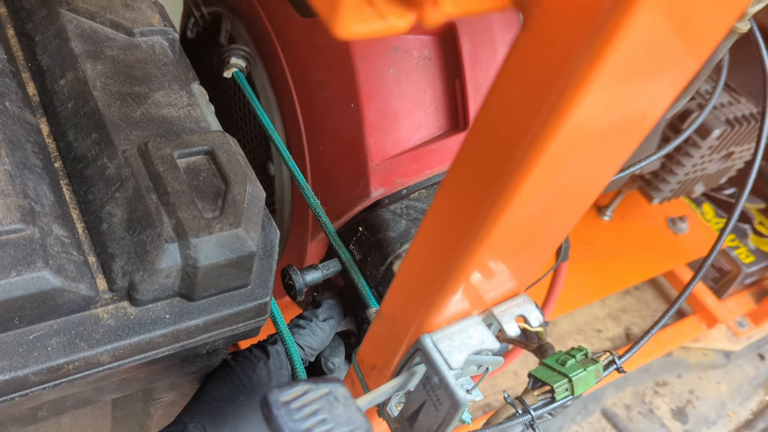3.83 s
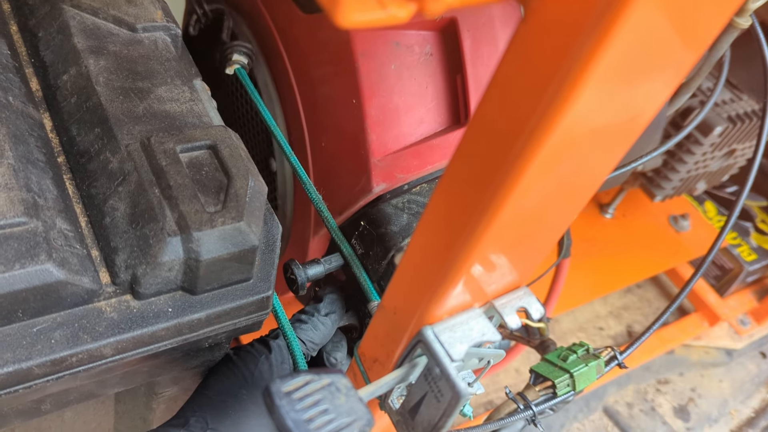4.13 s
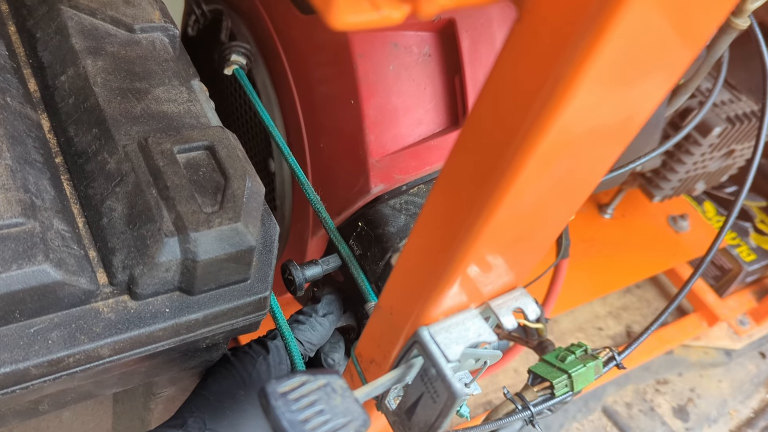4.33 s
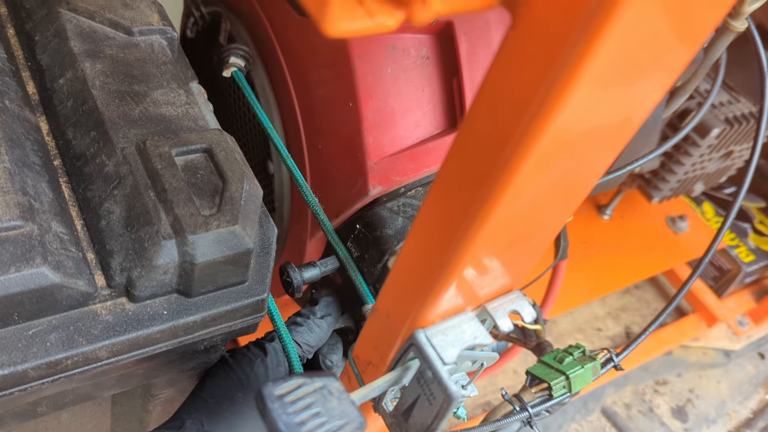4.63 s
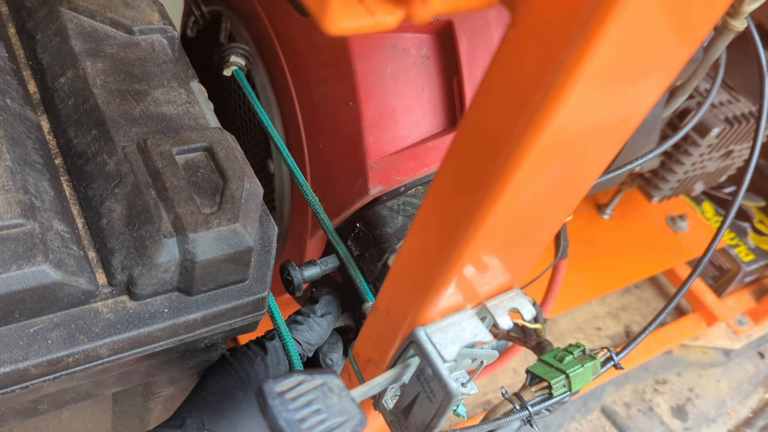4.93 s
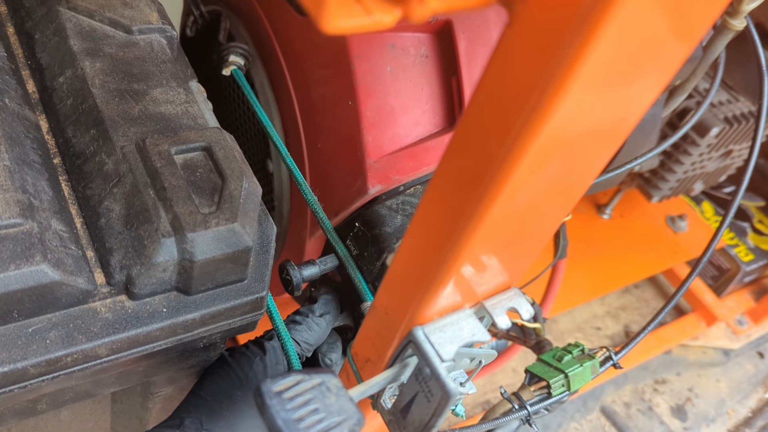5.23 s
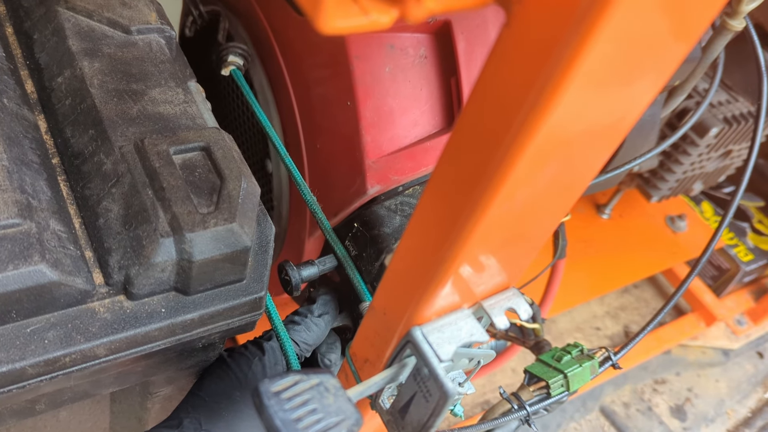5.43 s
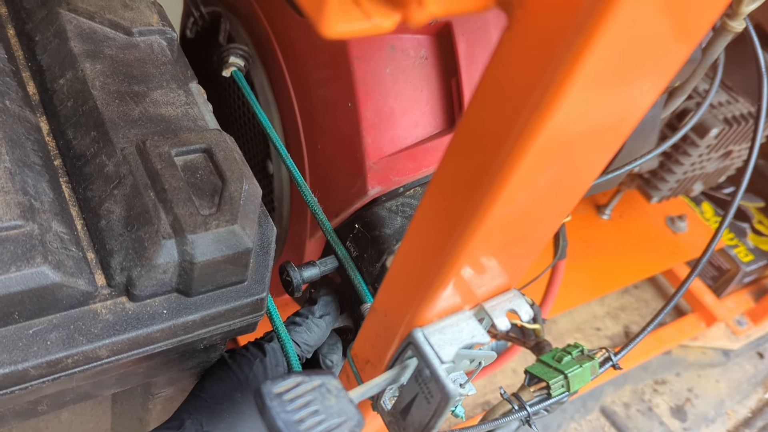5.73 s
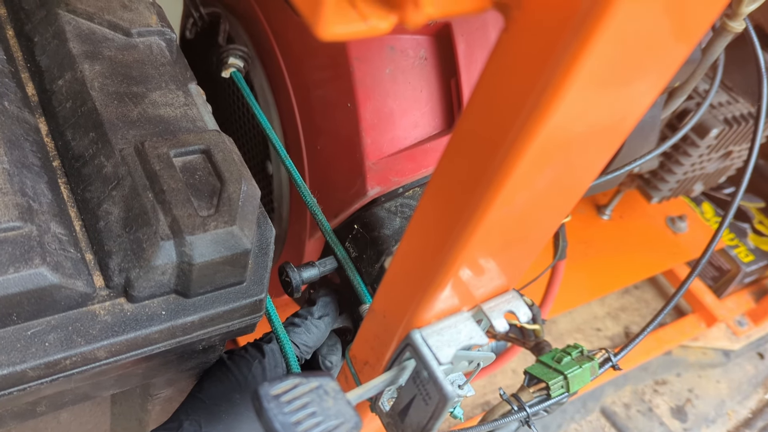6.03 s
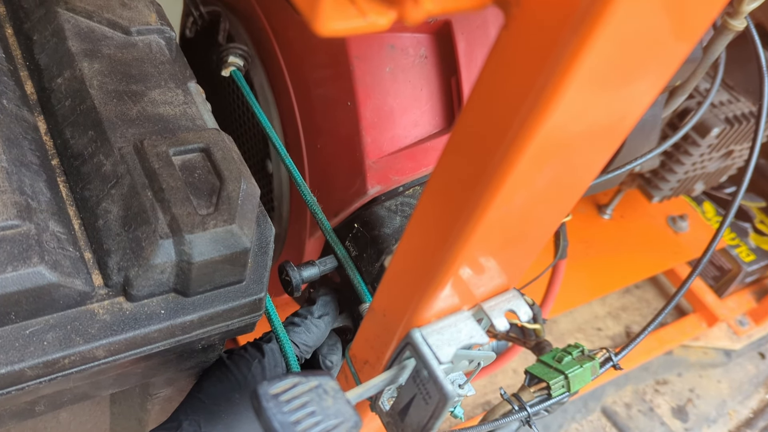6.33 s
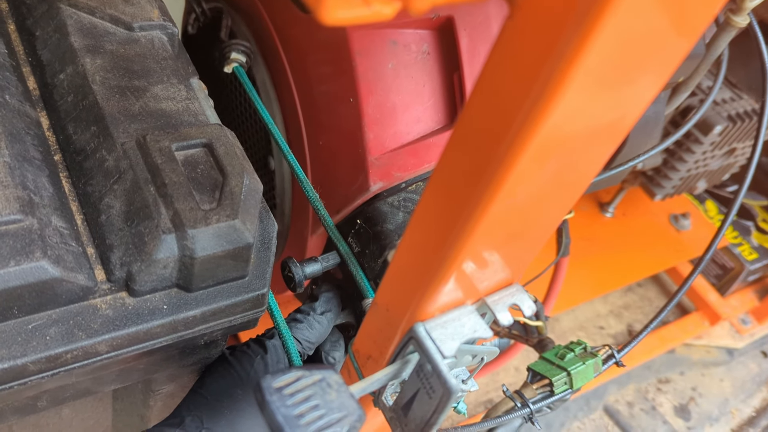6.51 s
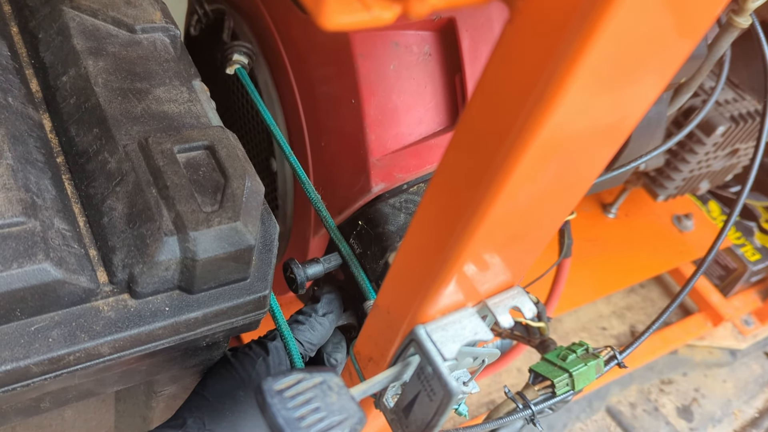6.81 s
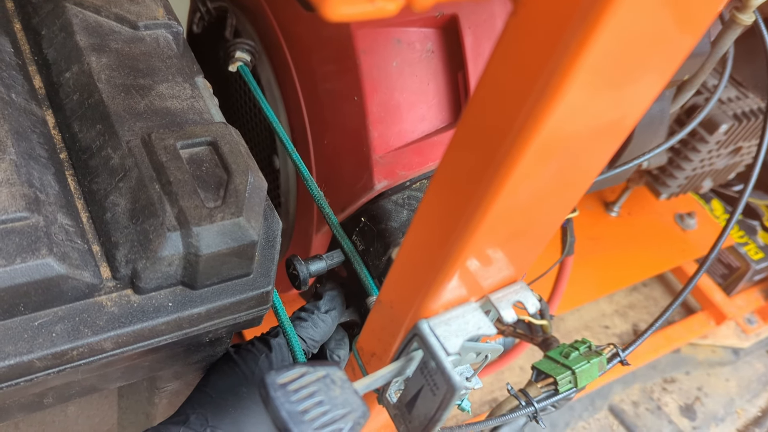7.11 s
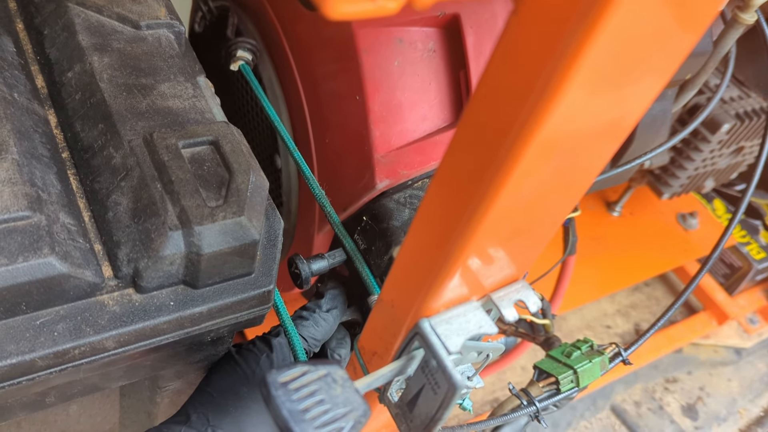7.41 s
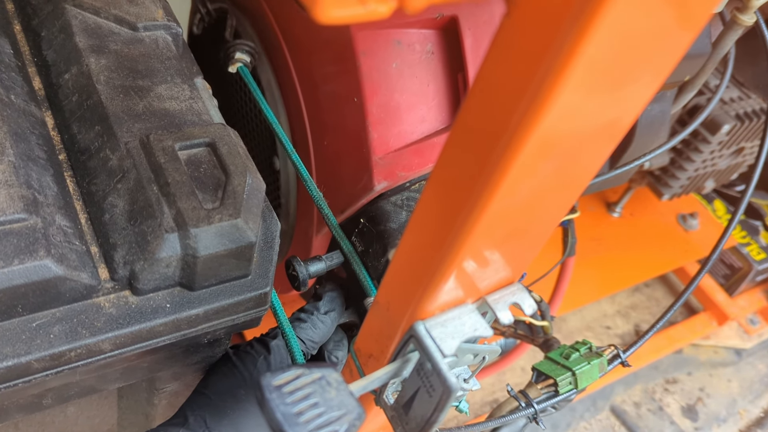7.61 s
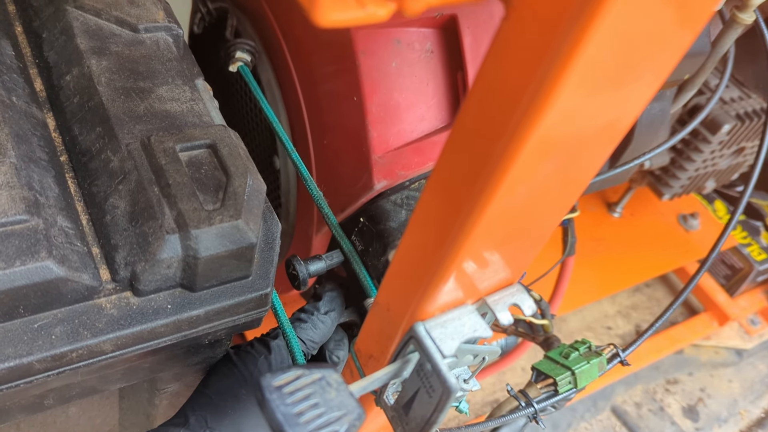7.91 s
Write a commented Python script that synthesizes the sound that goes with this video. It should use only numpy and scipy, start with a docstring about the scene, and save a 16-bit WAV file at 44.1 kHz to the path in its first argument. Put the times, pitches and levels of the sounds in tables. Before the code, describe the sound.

After a faint rustle and sharp switch clicks, a geared starter whirs in a limping rhythm, with late kicks as the engine almost fires.

```python
"""A starter motor cranks a small V-twin engine, close by outdoors; its pinion whines and rattles on the ring gear.
Both are built from the rate at which teeth meet, which sags at each of the two uneven compressions.
A hand first rustles (grainy noise) over a dull wash, and a key and solenoid click (cracks that ring the switch).
Gas puffs ring the exhaust pipe. Late on the engine catches three times, kicks ahead of the starter and falls back."""
import sys
import numpy as np
from scipy import signal
from scipy.fft import rfft, irfft, next_fast_len
from scipy.io import wavfile
from scipy.ndimage import uniform_filter1d

SR = 44100
rng = np.random.default_rng(int(sys.argv[2]) if len(sys.argv) > 2 else 0)


def to_wav(s):
    """Save 16-bit WAV."""
    ch = np.atleast_2d(s).T  # columns
    pcm = np.round(np.clip(ch, -1, 1) * 32767)  # PCM
    wavfile.write(sys.argv[1], SR, pcm.astype(np.int16))


def voltage_ratio(level):
    """Linear amplitude factor for a level in decibels (scalar or array-like)."""
    return 10 ** (np.asarray(level, float) / 20)


N = 355604
T = np.arange(N) / SR
SECOND = 0.36  # share of the cycle at which cylinder two passes its top

# turning of the crankshaft; cylinder one passes its top at whole numbers: time_s, cycles_done
CRANK = [(1.03, 0), (1.31, 1), (1.425, 1.36), (1.614, 2), (1.9, 3), (5.015, 14), (5.301, 15), (6.745, 20),
         (6.848, 20.36), (7.058, 21), (7.117, 21.36), (7.266, 22), (7.453, 23), (7.527, 23.36), (7.693, 24),
         (7.787, 24.36), (7.988, 25), (8.046, 25.36), (8.2, 26)]
# compressions of cylinders one and two, before chance and kicks:
# speed_lost (0-1), length (share of the cycle), roughness at the top (0-1), slack_db of the gears
SQUEEZES = [(.19, .18, .8, -1), (.12, .14, 0.44, -1.3)]
# moments when the engine catches:
# start_s, thud_peak_db, gain_hz in tooth rate before any sag, fall_back_s (decay time), slack_db of the gears after it
FIRINGS = [(7.058, -31, 225, .3, -1), (7.278, -24, 270.4, .15, -14), (7.994, -21, 240.3, 0.188, -11.5)]


def unit_rms(x):
    """Scales a sound to rms 1."""
    return x / np.sqrt(np.mean(abs(x) ** 2) + 1e-20)


def read_spectrum(points, hz):
    """Reads a spectrum on a log-frequency axis."""
    f, value = np.transpose(points)
    return np.interp(np.log(hz + 1), np.log(f + 1), value)


def columns(rows, at):
    """Reads every column of a curve at the given places."""
    place, *rest = np.transpose(rows)
    return [np.interp(at, place, column) for column in rest]


def drift(seconds, count):
    """Rows of smooth chance that change within the given time."""
    step = 16  # samples between draws
    size = max(round(seconds * SR / 2 / step), 1)
    draws = rng.standard_normal((count, N // step + 1))
    slow = uniform_filter1d(uniform_filter1d(draws, size), size)
    return uniform_filter1d(np.repeat(unit_rms(slow), step, axis=1), step)[:, :N]


def coloured(noises, spectrum):
    """Gives two unrelated noises a spectrum (dB per Hz) and the likeness of the two microphones, at rms 1."""
    # how alike left and right are: pitch_hz, likeness (0-1)
    likeness = [(60, 0.86), (180, 1), (550, 0.63), (1650, 0.023), (4970, 0.025), (15000, 0.18)]
    # left against right: pitch_hz, left_minus_right_db
    balance = [(60, 3), (120, -3), (240, 1.5), (480, 0), (950, -3.5), (1890, 0.5), (3770, -6), (7520, 4),
               (15000, 2.5)]
    size = next_fast_len(N)
    hz = np.fft.rfftfreq(size, 1 / SR)
    a, b = rfft(noises, size)
    same = np.clip(read_spectrum(likeness, hz), -1, 1)
    lean = voltage_ratio(read_spectrum(balance, hz) / 2)
    left = a * lean
    right = (same * a + np.sqrt(1 - same ** 2) * b) / lean
    pair = np.array([left, right]) * voltage_ratio(read_spectrum(spectrum, hz))
    return unit_rms(irfft(pair, size)[:, :N])


def surroundings():
    """A dull distant wash and the grainy rustle of a hand; their level drops just before the starter bites."""
    # spectrum of the dull sound: pitch_hz, level_db per Hz
    wash_spectrum = [(25, -32), (50, -8), (90, -4), (135, -15), (172, -2), (220, -10), (330, -5.5),
                     (520, -3), (900, -7.5), (1800, -3), (2400, -11.5), (4000, -23)]
    # spectrum of the rustle: pitch_hz, level_db per Hz
    rustle_spectrum = [(800, -18), (2500, -7), (4200, -4.5), (6600, -4.5), (8000, -13), (12000, -9),
                       (16000, -20)]
    # loudness of the hand before the level drop: time_s, rustle_db
    hand_curve = [(0, -48.5), (.15, -51.5), (.25, -57), (.32, -49.5), (.43, -47), (.452, -36.5), (.5, -50),
                  (.56, -58), (.67, -54), (.79, -55), (1.06, -61.5)]
    wash_db, dull_db = -50.5, 1  # distant wash; low part of the hand's sound against its rustle
    grain_db, grain_s = 2.5, 0.0025
    drop_at_s, drop_db, drop_fade_s = 1.093, -10, 0.0037  # turned down, perhaps by a gain control
    level_drop = voltage_ratio(drop_db * np.clip((T - drop_at_s) / drop_fade_s, 0, 1))
    hand = voltage_ratio(columns(hand_curve, T)[0])
    wash = coloured(rng.standard_normal((2, N)), wash_spectrum)
    grains = voltage_ratio(grain_db * drift(grain_s, count=1)) * rng.standard_normal((2, N))
    dull = np.hypot(voltage_ratio(wash_db), voltage_ratio(dull_db) * hand)
    return level_drop * (dull * wash + hand * coloured(grains, rustle_spectrum))


def clicks():
    """The key and solenoid click: each click is a short crack that rings the parts of the switch."""
    # key and solenoid: start_s, peak_db before the bass cut, sharpness_db, left_minus_right_db
    click_list = [(0.702, -11, -11, 3.5), (0.705, -10, -24, -8.5), (0.732, -15.5, 0, -1),
                  (1.069, -38.5, -2, -5), (1.142, -42, -2, 8), (1.167, -9.5, -2, 0)]
    # ringing parts of the switch: pitch_hz, level_db, t60_s (time to fall by 60 dB)
    switch_modes = [(330, -12, 0.043), (570, -3.5, 0.026), (710, -1.5, 0.023), (1450, -14, 0.019),
                    (1900, -1.5, 0.021), (2520, 0.5, 0.011), (3500, -0.5, 0.0085), (4220, 1.5, 0.0061),
                    (4950, -5, 0.018), (7300, -8, 0.011), (8800, -5, .012)]
    t, out = np.arange(SR // 8) / SR, np.zeros((2, N))
    cracks = rng.standard_normal((len(click_list), 2, len(t)))
    phases = rng.random((len(click_list), len(switch_modes), 2, 1))
    for (start_s, db, sharp_db, lean_db), crack, phase in zip(click_list, cracks, phases):
        scrape = crack * (voltage_ratio(-60 * t / 0.02) + 0.13 * voltage_ratio(-60 * t / 0.13))
        scrape = scrape * (1 - np.exp(-t / 0.0012))
        ring = 0
        for (hz, mode_db, t60), p in zip(switch_modes, phase):
            ring = ring + voltage_ratio(mode_db - 60 * t / t60) * np.sin(2 * np.pi * (hz * t + p))
        rung = signal.oaconvolve(scrape, ring, axes=1)[:, :len(t)]
        sound = 0.37 * unit_rms(scrape) + unit_rms(rung)
        # a harder click has more top
        sound = sound + np.diff(sound, prepend=0) * voltage_ratio(sharp_db)
        sides = voltage_ratio([[db + lean_db / 2], [db - lean_db / 2]])
        out[:, round(start_s * SR):][:, :len(t)] += sound / abs(sound).max() * sides
    # small parts make no bass
    return signal.sosfilt(signal.butter(2, 220, "high", fs=SR, output="sos"), out)


def tops():
    """Cycle count and time of every top, cylinders one and two in turn."""
    time_s, done = np.transpose(CRANK)
    n = np.arange(2 * round(done[-1]) + 1)
    at = n // 2 + SECOND * (n % 2)
    return at, np.interp(at, done, time_s)


def puff(db, from_hz, to_hz, t60, fall_s=0.02):
    """A push of gas rings the exhaust pipe with falling pitch."""
    t = np.arange(SR // 5) / SR
    turns = np.cumsum(to_hz + (from_hz - to_hz) * np.exp(-t / fall_s)) / SR
    shape = voltage_ratio(-60 * t / t60) * (1 - np.exp(-(t / 0.005) ** 2))
    return -voltage_ratio(db) * shape / shape.max() * np.sin(2 * np.pi * turns)


def firing(db):
    """The engine catches: a thud in the pipe and a low noisy blast of gas."""
    blast_db, blast_hz, blast_t60_s = -8, 500, 0.19
    thud = puff(db, 76.0, 59, 0.08)
    t = np.arange(len(thud)) / SR
    low = signal.butter(2, blast_hz, fs=SR, output="sos")
    gas = unit_rms(signal.sosfilt(low, rng.standard_normal(len(t))))
    return thud + voltage_ratio(db + blast_db - 60 * t / blast_t60_s) * (1 - np.exp(-t / 0.0027)) * gas


def exhaust():
    """Gas puffs in every cycle after the first, weak to begin with, and the sound of each firing."""
    # puffs in a cycle: place (share of the cycle), peak_db before chance and warm-up, start_hz, end_hz, t60_s
    puffs = [(0.188, -44, 131, 41.5, 0.41), (.39, -45, 60, 50.06, 0.1), (0.558, -35.5, 98, 39, 0.18),
             (.73, -41.5, 100, 60, .1), (.92, -44, 62.5, 48.7, 0.12)]
    spread_db, warmup_db = 1.0, -12
    out, cycles = np.zeros(N + SR), round(CRANK[-1][1])
    top_at, top_s = tops()
    chance = rng.standard_normal((cycles, len(puffs)))
    for n in range(1, cycles):
        for (share, db, *ring), luck in zip(puffs, chance[n]):
            sound = puff(db + spread_db * luck + warmup_db * np.exp(1 - n), *ring)
            start_s = np.interp(n + share, top_at, top_s)
            out[round(start_s * SR):][:len(sound)] += sound
    for start_s, db, *_ in FIRINGS:
        sound = firing(db)
        out[round(start_s * SR):][:len(sound)] += sound
    return out[:N]


def stroke(cycle):
    """Each compression slows the gears and ends in a clash: speed factor, whine dB, rattle dB, added roughness."""
    # a brief lighter drag between compressions, perhaps the valve springs:
    # place (share of the cycle), width (share of the cycle), speed_lost (0-1), roughness (0-1)
    light_drag = (.57, .05, .025, .12)
    # whine level: running_free_db, added_under_squeeze_db, added_in_clash_db
    whine_levels = (-2.0, 2.16, -6.5)
    # rattle level: running_free_db, added_under_squeeze_db, added_in_clash_db
    rattle_levels = (2.5, -3, 7)
    build, squeeze_rough = 0.6, 0.162  # share of a squeeze spent slowing; roughness it adds
    clash_share, let_go = 0.0642, 0.016  # shares of the cycle: clash before the top, release after it
    place, width, drag, drag_rough = light_drag
    bump = np.exp(-((cycle % 1 - place) / width) ** 2)
    sag, unrest, squeeze, clash = drag * bump, drag_rough * bump, 0, 0
    for top, (lost, length, rough, _) in zip((0, SECOND), SQUEEZES):
        ahead = (top + let_go - cycle) % 1 - let_go  # share of the cycle still to go
        release = np.clip(1 + ahead / let_go, 0, 1)
        progress = np.clip((length - ahead) / (build * length), 0, 1)
        press = np.sin(np.pi / 2 * progress) ** 2 * release
        hit = np.clip(1 - ahead / clash_share, 0, 1) * release
        sag, squeeze, clash = sag + lost * press, squeeze + press, clash + hit
        unrest = unrest + squeeze_rough * press + rough * hit
    whine_db, rattle_db = (a + b * squeeze + c * clash for a, b, c in (whine_levels, rattle_levels))
    return 1 - sag, whine_db, rattle_db, unrest


def kicks(top_s):
    """Firings throw the flywheel ahead: added tooth rate, shock roughness, and slack at the tops that follow."""
    kick_s, overrun_s = 0.04, 0.15  # time to speed up; decay time of the slack
    shock_before_s, shock_after_s = 0.0287, 0.0451
    hz = shock = slack_db = 0
    for start_s, _, gain_hz, fall_s, loose_db in FIRINGS:
        t, later = T - start_s, top_s - start_s
        hz = hz + gain_hz * np.clip(t / kick_s, 0, 1) * np.exp(-np.maximum(t - kick_s, 0) / fall_s)
        shock = shock + np.exp(-abs(t) / np.where(t < 0, shock_before_s, shock_after_s))
        slack_db = slack_db + loose_db * (later > kick_s / 2) * np.exp(-abs(later) / overrun_s)
    return hz, shock, slack_db


def mesh_motion():
    """How the gears turn: tooth rate, teeth passed, free rate, drive gain, whine dB, rattle dB and roughness."""
    # the starter: time_s, tooth_rate_hz between compressions, drive_db before slack and overrun, roughness (0-1)
    starter = [(1.155, 150, -29.5, 1), (1.185, 200.3, -22.5, 0.65), (1.21, 275.2, -24, .3),
               (1.245, 441, -24.5, 0.14), (1.29, 490.2, -23.5, 0.16), (1.32, 570, -25, 0.12),
               (1.5, 641.2, -24, 0.09), (1.7, 667.4, -24.5, .12), (3.5, 673.5, -24.5, .12),
               (5.2, 669.7, -25, .12), (5.6, 659.6, -24.5, .1), (7.02, 656.5, -24.5, .12),
               (7.6, 652, -24.5, .15), (7.85, 650, -24, 0.02), (8.06, 650, -25, 0.17)]
    rough_per_hz, soft_db_per_hz = 0.0017, -0.0018  # gears run looser and softer while the flywheel is ahead
    carry_hz = 397.5  # a flywheel this far ahead carries through a compression without slowing
    sag_spread = 0.12  # compressions differ by this share
    slack_share = 0.16  # share of the cycle over which contact is lost
    jitter, jitter_s = 0.0706, 0.00406  # unsteady speed, as a share, at full roughness
    runout_db, runout_teeth = 0.03, 23  # throb, and the teeth that pass in one
    at, top_s = tops()
    cycle = columns(CRANK, T)[0]
    free_hz, drive_db, rough = columns(starter, T)
    kick_hz, shock, loose_db = kicks(top_s)
    speed, whine_db, rattle_db, unrest = stroke(cycle)
    rough = np.clip(rough + shock + rough_per_hz * kick_hz + unrest, 0, 1)
    uneven = 1 + sag_spread * np.interp(T, top_s, rng.standard_normal(len(at)))
    speed = 1 - (1 - speed) * uneven * np.clip(1 - kick_hz / carry_hz, 0, 1)
    # the teeth lose contact as a piston nears its top and bite again at once
    slack_db = np.resize([row[-1] for row in SQUEEZES], len(at)) + loose_db
    coming = np.searchsorted(top_s, T)
    drive_db = drive_db + soft_db_per_hz * kick_hz
    drive_db = drive_db + slack_db[coming] * np.exp((cycle - at[coming]) / slack_share)
    unsteady = 1 + jitter * rough * drift(jitter_s, count=1)[0]
    hz = (free_hz + kick_hz) * uniform_filter1d(speed, 130) * unsteady
    turns = np.cumsum(hz) / SR
    # an off-centre shaft throbs
    drive_db = drive_db + runout_db * np.sin(2 * np.pi * turns / runout_teeth)
    drive = voltage_ratio(uniform_filter1d(drive_db, 60)) * (T > starter[0][0])
    return hz, turns, free_hz, drive, whine_db, rattle_db, rough


def gear_whine(hz, turns, whine_db, rough):
    """Meeting teeth sing at multiples of their rate; each partial wavers and fades as the mesh gets rough."""
    # partials: multiple of the tooth rate, level_db, left_minus_right_db, left_lead (radians)
    partials = [(1, -6.5, -4.5, 0.67), (2, -5.5, 5, 2.31), (3, -12, -2, 0.87), (4, -15.5, 10, 2.16),
                (5, -14.5, 3.5, 1.13), (7, -16.5, -7.5, 2.1), (6, -23, -11, 0.59), (8, -16.5, -6, 0.8),
                (9, -17, -7.5, 1.95), (10, -18.5, 3, 1.83), (11, -17.5, -1.5, 1.04), (12, -26, 18, 2.6),
                (13, -24, 12.5, 1.5), (14, -23.5, 15, 1.4)]
    radiate_hz, fade, waver, waver_s = 450, 0.42, 0.16, 0.0084
    whine = np.zeros((2, N))
    steady = (1 - fade * rough) / np.sqrt(1 + 2 * rough ** 2)
    for k, db, lean_db, lead in partials:
        # worn teeth: each partial wavers in size and phase, the higher ones more
        a, b, c, d = (waver * k ** 0.58 + rough) * drift(waver_s, count=4)
        tone = voltage_ratio(db + whine_db) * np.exp(2j * np.pi * (k * turns + rng.random())) * steady
        tone /= np.sqrt(1 + (radiate_hz / (k * hz)) ** 4)  # small parts radiate low notes poorly
        left_waver = 1 + a + 1j * b
        right_waver = 1 + 0.54 * a + 0.99 * c + 1j * (0.49 * b + 0.45 * d)
        whine[0] += voltage_ratio(lean_db / 2) * (left_waver * tone * np.exp(1j * lead)).real
        whine[1] += voltage_ratio(-lean_db / 2) * (right_waver * tone).real
    return whine


def gear_rattle(turns, free_hz, clatter_db, rough):
    """Each tooth strikes a burst of noise; loose teeth add a dull knocking noise."""
    # spectrum of the broad rattle: pitch_hz, level_db per Hz
    rattle_spectrum = [(25, -36), (50, -17), (100, -9.5), (140, -23), (190, -21), (250, -8), (500, -14.5),
                       (900, -0.5), (1400, -5), (2300, -2.5), (4000, -3), (6000, -5.5), (7000, -8.5),
                       (10000, -4.5), (14000, -12), (15800, -11.5)]
    # spectrum of the dull knock: pitch_hz, level_db per Hz
    knock_spectrum = [(120, -34), (230, -8), (400, -7), (700, -1.5), (1500, -16)]
    rattle_db, knock_db, bright_db, uneven_db = -9.5, -14, 12, 1.5
    gate = 0.45  # share of the noise that dies away after each strike
    tooth = voltage_ratio(uneven_db * rng.standard_normal(8192))[turns.astype(int) % 8192]
    burst = 1 - gate + gate * np.exp(-(turns % 1) / 0.53)
    strikes = tooth * burst * rng.standard_normal((2, N))
    rattle = voltage_ratio(clatter_db + rattle_db) * coloured(strikes, rattle_spectrum)
    # slow teeth strike softly: the top of the rattle grows with speed
    top = signal.sosfilt(signal.butter(1, 5000, "high", fs=SR, output="sos"), rattle)
    rattle += top * (voltage_ratio(bright_db * (free_hz / 670 - 1)) - 1)
    # loose teeth knock dully on the crankcase
    rattle += voltage_ratio(knock_db) * rough * coloured(rng.standard_normal((2, N)), knock_spectrum)
    return rattle


def housing(x):
    """The starter housing rings with the gears at its own pitches."""
    # modes: pitch_hz, width_hz, gain_db of each mode alone over the plain sound
    modes = [(437, 33, 7.5), (577.7, 31, 7), (797, 155, 4.5), (1370, 800, -1), (1627, 33, 11.5),
             (1799, 108, 15), (1992, 155, 11.5), (2740, 490, 5), (3470, 170, 3.5), (4637, 117, 10),
             (5060, 120, 9.5), (5445, 72, 13), (5660, 40, 11.5), (6143, 260, 13), (6495, 99, 13),
             (7370, 125, 5.5), (7810, 350, 7), (8490, 300, 8), (9090, 200, 4.5), (11820, 760, 6.5)]
    size = next_fast_len(N + SR // 2)
    hz = np.fft.rfftfreq(size, 1 / SR)
    response = 1 + sum((voltage_ratio(db) - 1) / (1 + 2j * (hz - f) / width) for f, width, db in modes)
    return irfft(rfft(x, size) * response, size)[:, :N]


def treble_ring(x):
    """A short, dense treble ring made of noise; three random rings crossfade, different at each microphone."""
    ring_t60_s, ring_db, from_hz, shift_s = 0.041, -5, 2500, 0.2512
    t, out = np.arange(SR // 10) / SR, 0
    high = signal.butter(2, from_hz, "high", fs=SR, output="sos")
    for n in range(3):
        ring = signal.sosfilt(high, rng.standard_normal((2, len(t))) * voltage_ratio(-60 * t / ring_t60_s))
        ring = ring / np.linalg.norm(ring[0])
        share = np.sqrt(2 / 3) * np.cos(np.pi * (T / shift_s + n) / 3)  # the three squares sum to one
        out = out + signal.oaconvolve((x * share)[None], ring, axes=1)[:, :N]
    return voltage_ratio(ring_db) * out


def gears():
    """Pinion and ring gear: whine and rattle at the sagging tooth rate ring the housing, with a treble ring."""
    hz, turns, free_hz, drive, whine_db, rattle_db, rough = mesh_motion()
    whine = gear_whine(hz, turns, whine_db, rough)
    rattle = gear_rattle(turns, free_hz, rattle_db, rough)
    rung = housing(drive * (whine + rattle))
    return rung + treble_ring(rung[0])


def scene():
    """All sources at the two microphones."""
    return surroundings() + clicks() + exhaust() + gears()


def top_cut(x):
    """Nothing passes above the cut-off."""
    return signal.sosfilt(signal.butter(12, 17030, fs=SR, output="sos"), x)


def record(dry):
    """The microphones lose the deep bass, and a steep filter cuts the extreme treble."""
    edge_hz = 15900
    edge = signal.firwin(511, edge_hz, window=("kaiser", 9), fs=SR)
    no_bass = signal.sosfilt(signal.butter(2, 45, "high", fs=SR, output="sos"), dry)
    mix = signal.oaconvolve(no_bass, edge[None], "same", axes=1)
    return top_cut(mix)


dry = scene()
out = record(dry)
to_wav(out)
```